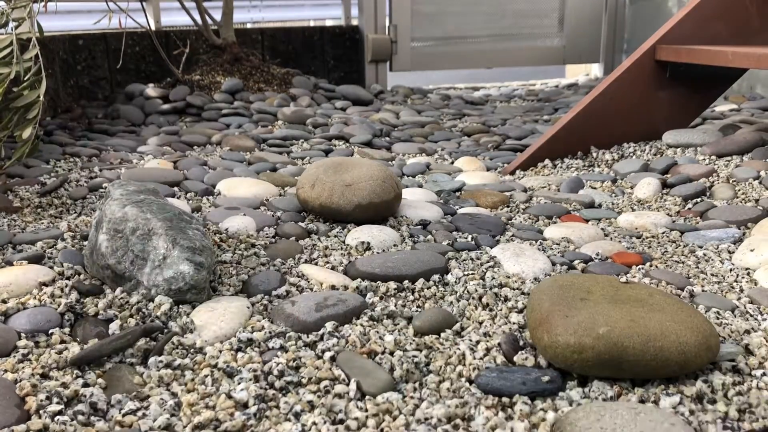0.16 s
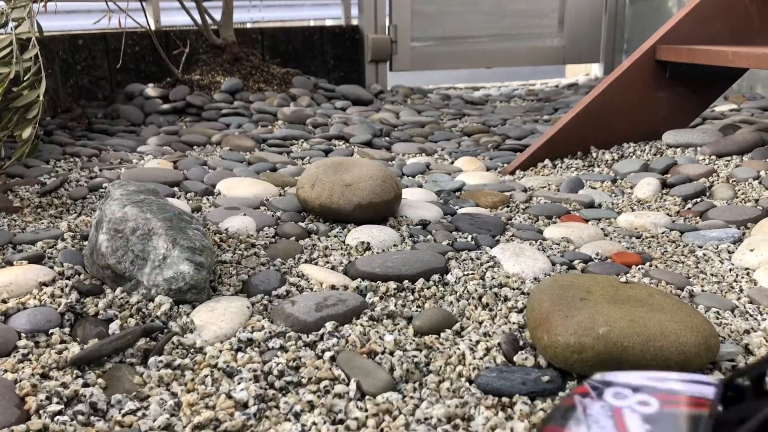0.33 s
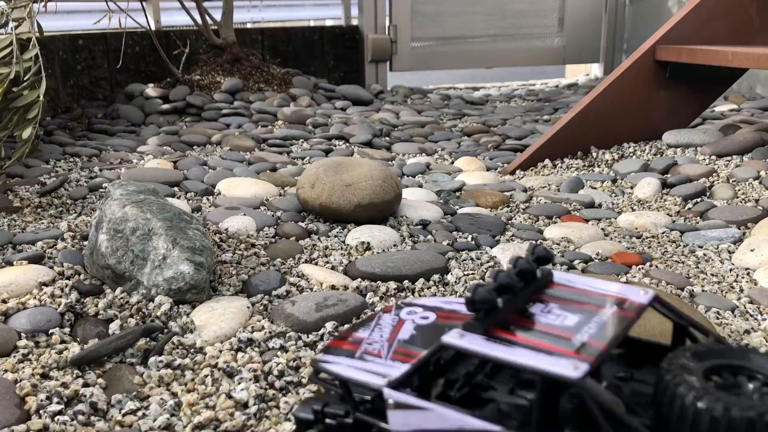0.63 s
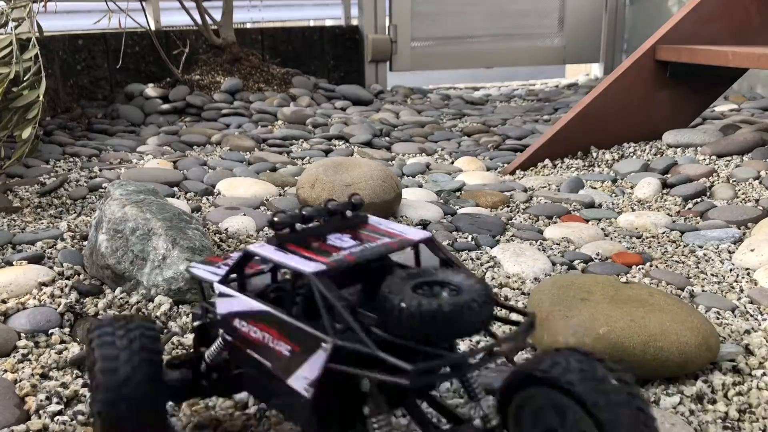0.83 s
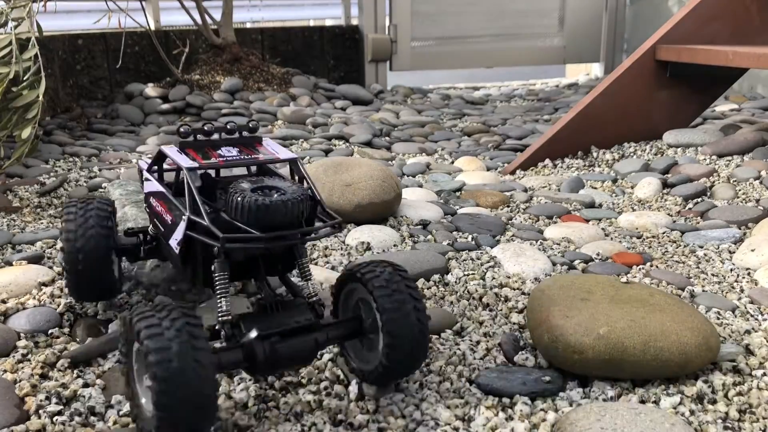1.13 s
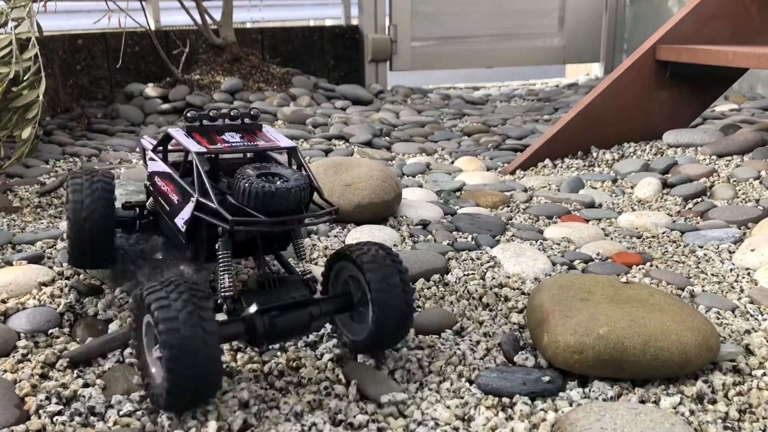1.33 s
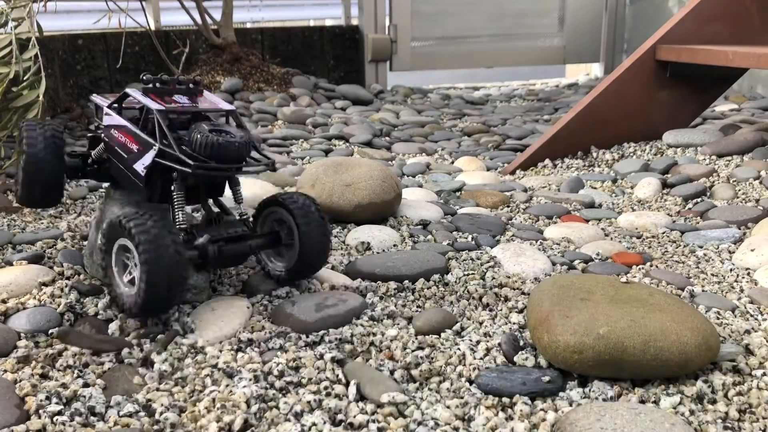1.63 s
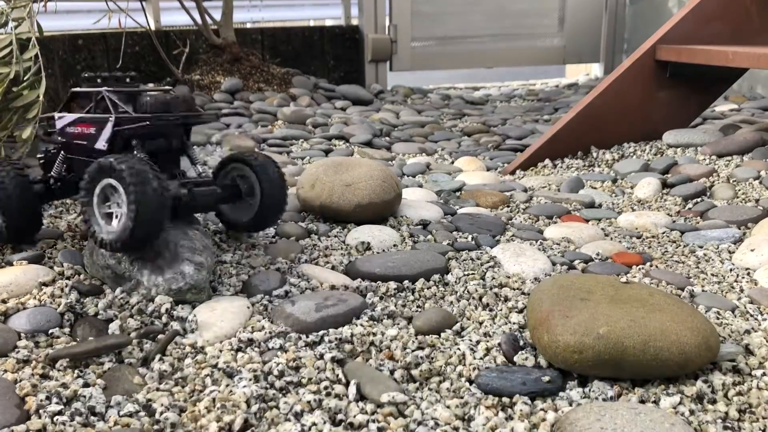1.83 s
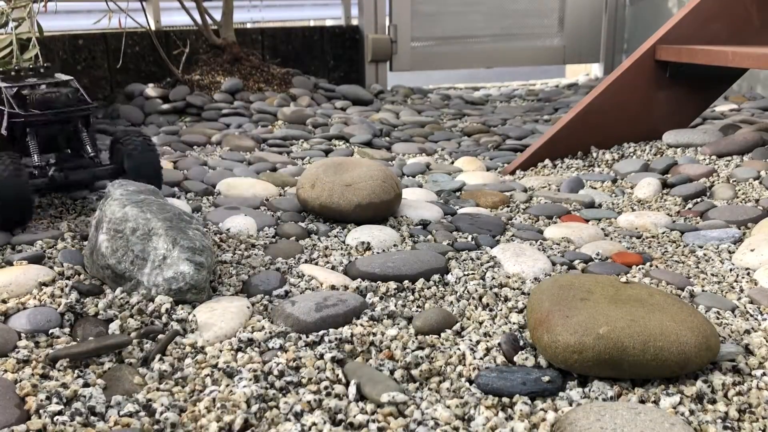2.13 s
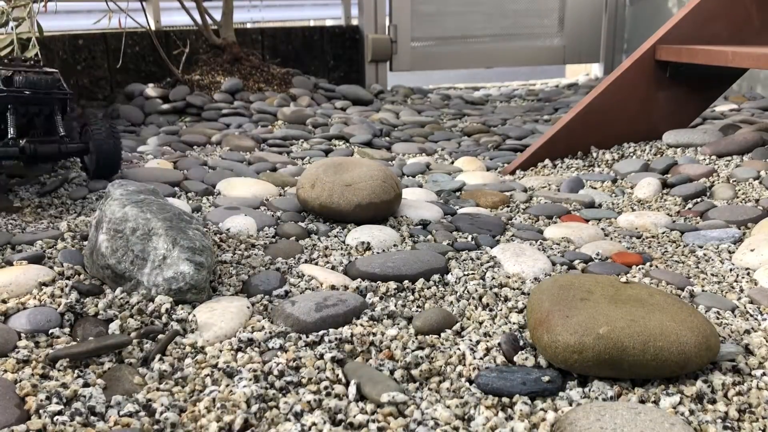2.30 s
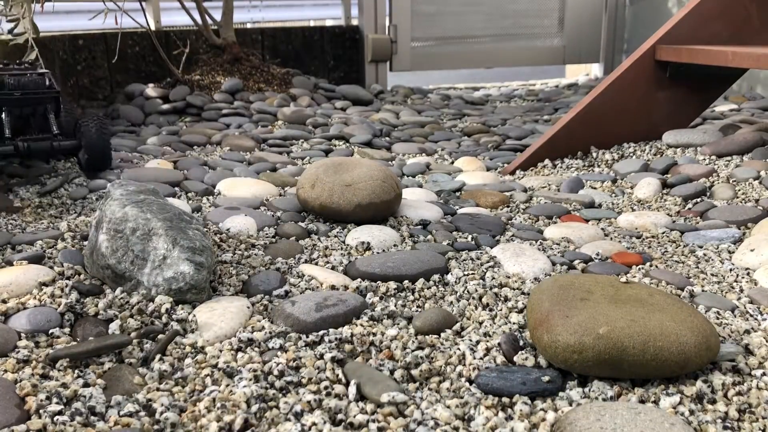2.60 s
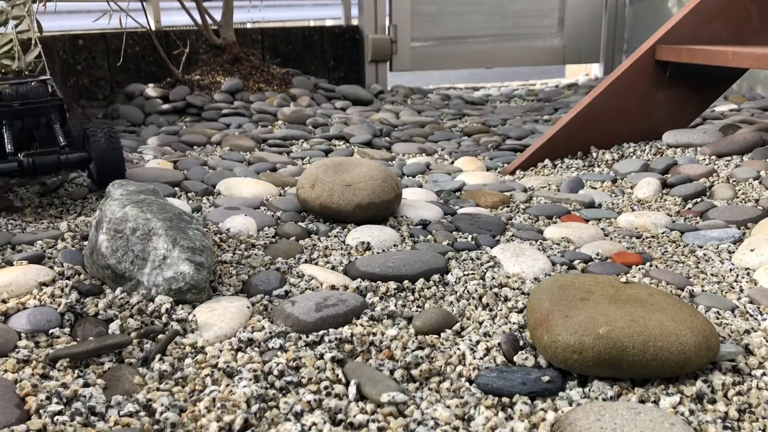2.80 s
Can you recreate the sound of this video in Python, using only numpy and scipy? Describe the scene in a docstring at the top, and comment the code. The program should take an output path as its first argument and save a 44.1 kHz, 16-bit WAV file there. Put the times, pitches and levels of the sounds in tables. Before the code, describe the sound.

A small electric toy car whirs in rattling throttle bursts, then climbs a rock with falling gear squeaks, gravel crunching, bumps and sharp pebble knocks, ending in another short whir; close, fairly dry outdoor sound in a quiet garden.

```python
"""Toy car over garden gravel

A small electric toy car crawls away over gravel and pebbles in a garden, its motor drone fading.
Throttle blips make the plastic gearbox rattle and grind: uneven tooth clicks ring its housing.
Then it climbs a rock, with a falling squeak, a sagging tooth tone, each time a tyre catches.
Grit crunches as ringing clicks, the tyres patter, the chassis bumps and wheels thud as shaped noise,
and a few pebbles knock sharply. Short echoes follow; the garden is a steady noise bed."""
import sys
import numpy as np
from scipy import signal
from scipy.fft import rfft, irfft, next_fast_len
from scipy.io import wavfile

SR = 44100
rng = np.random.default_rng(int(sys.argv[2]) if len(sys.argv) > 2 else 0)


def master(y):
    """Save y as 16-bit WAV."""
    cut = np.clip(np.atleast_2d(y).T, -1, 1)
    pcm = np.round(cut * 32767)  # scale
    wavfile.write(sys.argv[1], SR, pcm.astype(np.int16))


N = 130095
T = np.arange(N) / SR  # s

# Every table level is relative: the trims named *_DB and the mix in each function act on top.

# tooth rate of the gears and strength of their whine: [t/s, f/Hz, level/dB]
GEAR_SPEED = [(.13, 758.7, -67), (.18, 1302, -43.5), (.32, 2022, -58), (.6, 1000, -60), (.655, 1108, -44.5),
              (.69, 1532, -39), (.76, 1858, -49), (.86, 2264, -40), (.92, 1706, -62), (1.09, 1512, -44),
              (1.42, 2392, -71), (1.56, 2189, -42.5), (1.72, 2316, -62), (1.85, 2260, -42.5),
              (1.96, 2427, -48.5), (2.59, 2397, -68), (2.635, 2456, -36), (2.7, 2353, -66),
              (2.77, 2204, -65), (2.81, 2282, -50), (2.828, 2015, -36.5), (2.848, 1698, -53),
              (2.885, 2056, -40), (2.95, 2114, -44)]
SPEED_HUNT = .012  # slow spread of the tooth rate, as a fraction


def gearbox():
    """Meshing plastic teeth rattle and whine at one shared rate, and squeak under load."""
    tooth_hz, whine_db = in_time(GEAR_SPEED)
    tooth_hz = tooth_hz * (1 + SPEED_HUNT * drift(25))
    load, loaded_hz = catches()
    return rattle(tooth_hz, load) + gear_whine(tooth_hz, whine_db) + squeak(load, loaded_hz)


# rattle of the running gearbox: [t/s, level/dB]
DRIVE = [(0, -32), (.06, -38), (.085, -56), (.125, -49), (.4, -32.5), (.6, -34.5), (.92, -34.5),
         (1.06, -37.5), (1.14, -28), (1.33, -34), (1.4, -28), (1.62, -28.5), (1.74, -33.5), (1.8, -29),
         (2.22, -35.5), (2.47, -40), (2.545, -50.5), (2.67, -31.5), (2.95, -33.5)]
# the gears grind briefly as the wheels jolt: [middle t/s, level/dB]
GRINDS = [(0.038, -31.5), (0.198, -22.5), (0.216, -22.5), (0.328, -25.5), (.654, -21), (.687, -21.5),
          (0.723, -23), (0.745, -20.5), (.791, -21), (0.813, -20.5), (0.831, -27.5), (.879, -28.5),
          (0.985, -30.5), (1.11, -20.5), (1.641, -29), (1.669, -44), (1.725, -30.5)]
# dry clatter of the teeth, close to the plastic: [f/Hz, level/dB]
TEETH = [(200, -39), (400, -20), (2500, 7.5), (4500, 5.5), (8000, 2), (12000, -2), (16000, -7.5)]
RATTLE_DB, TOOTH_SPREAD_DB, RATTLE_FLUTTER_DB = -1.5, 3, 4
PINION_TEETH, BUZZ_DB = 6, -3  # the pinion knocks once a turn
CRAWL_RING_DB, CATCH_RATTLE_DB, BLIP_TEETH_DB = -2.5, -3.5, -5
BLIP_RISE_S, SPIN_UP_S = 0.017, 0.15  # the housing rings first, the clatter builds up later


def rattle(tooth_hz, load):
    """Teeth strike unevenly, clatter and ring the housing, driven by crawl, load, blips and grinds."""
    drive_db, = in_time(DRIVE)
    # on average two strikes per tooth period
    teeth = np.floor(np.cumsum(2 * tooth_hz * (1 + .3 * drift(900))) / SR)
    strikes = clicks(np.diff(teeth, prepend=0) > 0, TOOTH_SPREAD_DB) / np.sqrt(tooth_hz)
    strikes = strikes * from_db(RATTLE_FLUTTER_DB * np.tanh(drift(39.5)))
    turns = np.diff(np.floor(np.cumsum(tooth_hz / PINION_TEETH) / SR), prepend=0)

    force = np.hypot(from_db(drive_db + RATTLE_DB), from_db(CATCH_RATTLE_DB) * load) / np.sqrt(2)
    grind = sum(swell(s, db) for s, db in GRINDS)

    ring_force = np.hypot(from_db(CRAWL_RING_DB) * force, np.hypot(throttle(BLIP_RISE_S), grind))
    housing = ring_force * housing_ring(rms_one(strikes) + from_db(BUZZ_DB) * rms_one(turns))

    strain = np.hypot(throttle(SPIN_UP_S), grind)
    clatter_force = np.hypot(force, from_db(BLIP_TEETH_DB) * strain)
    clatter = clatter_force * rms_one(colour(strikes, TEETH))
    return housing + clatter


# blips of full throttle: [start t/s, end t/s, level/dB]
BLIPS = [(0.127, 0.341, -23), (0.347, 0.394, -22.5), (0.617, 0.894, -25.5)]
BLIP_EDGE_S = 0.0035


def throttle(rise_s):
    """Force of the blips: each builds up, holds and switches off."""
    force = 0
    for on, off, db in BLIPS:
        build_up = 1 - np.exp(-np.maximum(T - on, 0) / rise_s)
        switch_off = (1 - np.tanh((T - off) / BLIP_EDGE_S)) / 2
        force = force + from_db(db) * build_up * switch_off
    return force


# resonances of the gear housing: [f/Hz, width f/Hz, level/dB]
HOUSING = [(826, 92, -11.5), (1470, 74, -10.5), (2240, 75, -13.5), (4290, 360, 0), (5146, 340, 1),
           (6045, 220, -3.5), (7400, 470, -21.5)]
RING_WANDER, RING_FLUTTER_DB = .04, 4.5


def housing_ring(strikes):
    """Each resonance of the housing wanders and flutters as the loose gears shift."""
    out = 0
    for hz, width, db in HOUSING:
        # shift the wandering resonance down to 0 Hz, smooth there, and shift back
        turn = np.exp(2j * np.pi * np.cumsum(hz * (1 + RING_WANDER * drift(30))) / SR)
        r = np.exp(-np.pi * width / SR)
        ring = np.real(turn * signal.lfilter([1 - r], [1, -r], strikes / turn + 1e-18))
        out = out + from_db(db + RING_FLUTTER_DB * np.tanh(drift(40))) * ring
    return rms_one(out)


WHINE_DB, WHINE_RING_DB = 1, 0
SPEED_WOBBLE, WHINE_FLUTTER_DB = .036, 8


def gear_whine(tooth_hz, whine_db):
    """The teeth sing at their meshing rate, heard directly and through the housing."""
    whine = from_db(whine_db + WHINE_DB) * mesh_tone(tooth_hz, SPEED_WOBBLE, WHINE_FLUTTER_DB)
    return whine + from_db(WHINE_RING_DB) * resonate(whine, HOUSING)


# the housing rings broadly with the squeal: [f/Hz, width f/Hz, level/dB]
SQUEAK = [(4600, 900, 6)]
SQUEAL_DB, SQUEAL_WOBBLE = -5.5, .017


def squeak(load, loaded_hz):
    """Loaded teeth squeal as their rate sags, and the housing rings along."""
    tone = rms_one(mesh_tone(loaded_hz, SQUEAL_WOBBLE, flutter_db=2.4))
    squeal = from_db(SQUEAL_DB) * load * tone
    return squeal + resonate(squeal, SQUEAK)


# a tyre catches and loads the gears: [middle t/s, level/dB, tooth rate f/Hz at the middle]
CATCHES = [(1.183, -25, 3322), (1.219, -25.5, 3210), (1.26, -23.5, 2890), (1.306, -22.5, 2830),
           (1.361, -20.5, 2950), (1.431, -26.5, 2371), (1.46, -26, 2938), (1.51, -26, 2296),
           (1.783, -24, 2690), (1.888, -28, 2113), (1.967, -26.5, 2386), (2.021, -29, 2104),
           (2.072, -28.5, 2530), (2.122, -27.5, 2410), (2.18, -28.5, 2373), (2.308, -29.5, 2088),
           (2.716, -33, 2130)]
SAG_S, LOADED_HZ = .011, 2050  # the pitch sags towards LOADED_HZ


def catches():
    """Load of the catching tyres, and the pitch that sags through each catch."""
    load, hz = np.zeros(N), np.full(N, float(LOADED_HZ))
    for s, db, rate in CATCHES:
        grip = swell(s, db)
        sagging = LOADED_HZ + (rate - LOADED_HZ) * np.exp(np.minimum((s - T) / SAG_S, .5))
        hz = np.where(grip > load, sagging, hz)  # the strongest catch sets the pitch
        load = np.maximum(load, grip)
    return load, hz


SWELL_S = 0.0063


def swell(s, db):
    """A brief bell-shaped rise and fall of the load on the gears."""
    return from_db(db) * np.exp(-.5 * np.minimum(((T - s) / SWELL_S) ** 2, 100))


OVERTONES_DB = [4, -3.5, -9]  # first three multiples of the tooth rate


def mesh_tone(hz, wobble, flutter_db):
    """Tone of meshing teeth; every overtone flutters on its own."""
    phase = 2 * np.pi * np.cumsum(hz * (1 + wobble * drift(200))) / SR
    tone = 0
    for k, db in enumerate(OVERTONES_DB, 1):
        flutter = rms_one(from_db(flutter_db * np.tanh(drift(70))))
        tone = tone + from_db(db) * flutter * np.sqrt(2) * np.sin(k * phase)
    return tone


HUM_HZ, HUM_WIDTH_HZ = 330, 35
HUM_DB, RECEDE_DB_PER_S = -47.5, 3  # the drone fades as the car leaves


def motor_hum():
    """The motor shakes the frame, which drones at one low resonance."""
    drone = rms_one(resonate(rng.standard_normal(N), [(HUM_HZ, HUM_WIDTH_HZ, 0)]))
    return from_db(HUM_DB - RECEDE_DB_PER_S * T) * drone


# tyres rolling over the ground, for grit and tread alike: [t/s, level/dB]
ROLL = [(0, -44), (.2, -44), (.45, -38.5), (.57, -57), (.66, -41.5), (1.04, -43), (1.17, -40.5), (2.0, -47),
        (2.38, -56), (2.48, -46), (2.54, -56), (2.7, -67), (2.95, -47.5)]
# tone of the grit under the tyres: [f/Hz, level/dB]
GRIT = [(500, -21), (1500, 7.5), (4000, 3.5), (16000, -6.5)]
GRAINS_PER_S, GRAIN_SPREAD_DB, GRAIN_CYCLES = 2200, 1, 52  # more cycles: narrower ring
GRIT_DB, CLUMP_DB = 3.5, 18


def gravel():
    """Clumps of tiny stones click, each dealt one of twenty pitches."""
    crunch_db, = in_time(ROLL)
    grains = clicks(rng.random(N) < GRAINS_PER_S / SR, GRAIN_SPREAD_DB)
    grains = grains * from_db(CLUMP_DB * np.tanh(drift(30)))
    pitches = np.geomspace(1200, 15500, 20)  # Hz
    dealt = rng.integers(0, len(pitches), N)
    rings = 0
    for k, hz in enumerate(pitches):
        rings = rings + resonate(grains * (dealt == k), [(hz, 2 * hz / GRAIN_CYCLES, 0)])
    return from_db(crunch_db + GRIT_DB) * rms_one(colour(rings, GRIT))


# dull tone of the tread: [f/Hz, level/dB]
TYRES = [(80, -58), (330, -1.5), (780, -0.5), (2500, -13.5)]
ROLL_DB = 3.5


def tyres():
    """Tread blocks patter on the stones, about 600 random clicks a second."""
    roll_db, = in_time(ROLL)
    patter = clicks(rng.random(N) < 600 / SR, spread_db=4.5)
    return from_db(roll_db + ROLL_DB) * rms_one(colour(patter, TYRES))


# the chassis bumps on a stone: [t/s, level/dB]
BUMPS = [(0.203, -31.5), (1.076, -31), (1.166, -30), (1.342, -33.5), (1.705, -30), (1.762, -31.5),
         (1.926, -35), (1.985, -32), (2.296, -33.5)]
# tone of the shaken chassis: [f/Hz, level/dB]
CHASSIS = [(40, -40), (130, 4), (800, 14.5), (1400, 3.5), (12000, -31)]
BUMP_DB, BUMP_RISE_S, BUMP_FALL_S = 1, 0.00033, 0.013


def bumps():
    """Short dull shudders of the chassis: coloured noise that starts fast and dies away."""
    shake = 0
    for s, db in BUMPS:
        age = np.maximum(T - s, 0)
        shudder = (1 - np.exp(-age / BUMP_RISE_S)) * np.exp(-age / BUMP_FALL_S)
        shake = shake + from_db(db + BUMP_DB) * shudder
    return shake * rms_one(colour(rng.standard_normal(N), CHASSIS))


# a wheel drops with a soft thud: [t/s, level/dB]
THUDS = [(1.636, -41), (1.96, -39.5), (2.09, -43.5), (2.819, -40.5)]
# low resonances of the wheel: [f/Hz, width f/Hz, level/dB]
WHEEL = [(90.82, 88, 3), (166.3, 260, -2)]
THUD_S = 0.013  # time to the peak


def thuds():
    """Soft tyres land and wobble briefly: low noise that swells and fades."""
    push = 0
    for s, db in THUDS:
        age = np.maximum(T - s, 0) / THUD_S
        push = push + from_db(db) * age * np.exp(1 - age)
    return push * rms_one(resonate(rng.standard_normal(N), WHEEL))


# sharp knocks of pebbles on plastic: [t/s, level/dB, length of the chatter t/s]
KNOCKS = [(0.0972, -26, 0.005), (1.0782, -17, 0.0092), (1.175, -13, 0.0018), (1.924, -17, 0.0034),
          (1.9851, -11.5, 0.0028), (2.413, -22.5, 0.004), (2.5558, -17, 0.0045)]
# resonances of a knock: [f/Hz, width f/Hz, level/dB]
PEBBLE = [(1000, 190, -10.5), (2970, 470, 6), (4580, 200, 15), (5700, 200, 10), (6940, 400, 5.5),
          (11500, 27000, -5)]
KNOCK_DB = -5


def knocks():
    """A hard contact chatters for a few milliseconds and rings briefly."""
    contact = 0
    for s, db, length in KNOCKS:
        hold = np.exp(-np.minimum(np.abs(T - s) / length, 3) ** 4)
        contact = contact + from_db(db + KNOCK_DB) * (T >= s) * hold
    chatter = rng.choice([-1., 1.], N)
    return resonate(contact * chatter, PEBBLE) / np.std(resonate(chatter, PEBBLE))


ECHO_DB, ECHO_T60_S = -16.5, 0.035


def echoes(x):
    """Sparse quick reflections from stones, steps and the house wall."""
    age = T[:SR // 4]
    sparse = rng.standard_normal(len(age)) * (rng.random(len(age)) < .03)
    tail = sparse * (age > .002) * from_db(-60 * age / ECHO_T60_S)
    return from_db(ECHO_DB) * signal.fftconvolve(x, tail / np.linalg.norm(tail))[:N]


# tone of the garden's background: [f/Hz, level/dB]
GARDEN = [(25, -41), (60, -0.5), (110, 3.5), (500, -11), (780, -2), (1200, -11), (4000, -11), (16000, -69)]
GARDEN_DB = -46.5


def garden():
    """The garden around the car: steady coloured noise."""
    return from_db(GARDEN_DB) * rms_one(colour(rng.standard_normal(N), GARDEN))


def from_db(db):
    """Decibels to gain."""
    return 10 ** (np.asarray(db) / 20)


def rms_one(x):
    """Scale to rms 1."""
    return x / np.sqrt(np.mean(x ** 2) + 1e-20)


def in_time(rows):
    """Each column of a curve at every sample."""
    s, *columns = np.transpose(rows)
    return [np.interp(T, s, c) for c in columns]


def colour(x, spectrum):
    """Smooth equaliser through [f/Hz, level/dB] points."""
    hz, db = np.transpose(spectrum)
    size = next_fast_len(N + SR // 10)
    f = np.maximum(np.fft.rfftfreq(size, 1 / SR), 1)
    gain = from_db(np.interp(np.log(f), np.log(hz), db))
    return irfft(rfft(x, size) * gain, size)[:N]


def drift(rate):
    """Smoothed random wander with rms 1, faster for a higher rate."""
    r = np.exp(-80 * np.pi * rate / SR)  # computed on every 40th sample
    noise = rng.standard_normal(N // 40 + 2002)
    slow = signal.lfilter([1], [1, -2 * r, r * r], noise)[2000:]
    return np.interp(np.arange(N) / 40, np.arange(len(slow)), rms_one(slow))


def resonate(x, modes):
    """Parallel resonances of [f/Hz, width f/Hz, level/dB], signs alternating."""
    out = 0
    for k, (hz, width, db) in enumerate(modes):
        r = np.exp(-np.pi * width / SR)
        poles = [1, -2 * r * np.cos(2 * np.pi * hz / SR), r * r]
        ring = (1 - r * r) / 2 * signal.lfilter([1, 0, -1], poles, x + 1e-18)
        out = out + (-1) ** k * from_db(db) * ring
    return out


def clicks(born, spread_db):
    """Clicks of random sign and size where born is true."""
    size = from_db(spread_db * np.minimum(rng.exponential(1, N), 3.3))
    return born * size * rng.choice([-1, 1], N)


def scene():
    """The car over the garden's background, alike in both channels."""
    car = gearbox() + motor_hum() + gravel() + tyres() + bumps() + thuds() + knocks()
    mono = car + echoes(car) + garden()
    return np.array([mono, mono])


CUTOFF_HZ = 16000


def record(dry):
    """The deepest bass, below 36 Hz, is removed; the top is cut steeply."""
    thin = signal.sosfilt(signal.butter(2, 36, "high", fs=SR, output="sos"), dry)
    return signal.sosfilt(signal.ellip(12, .1, 85, CUTOFF_HZ, fs=SR, output="sos"), thin)


dry = scene()
out = record(dry)
master(out)
```